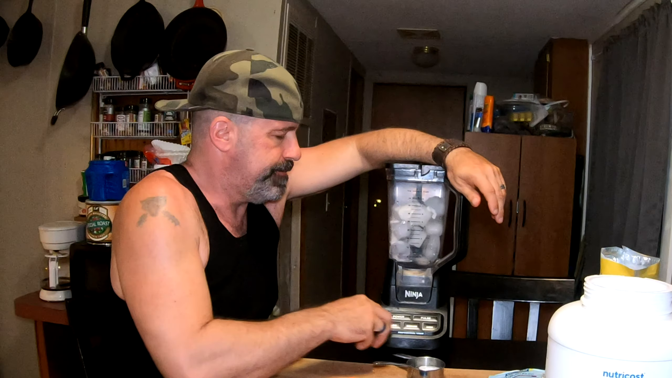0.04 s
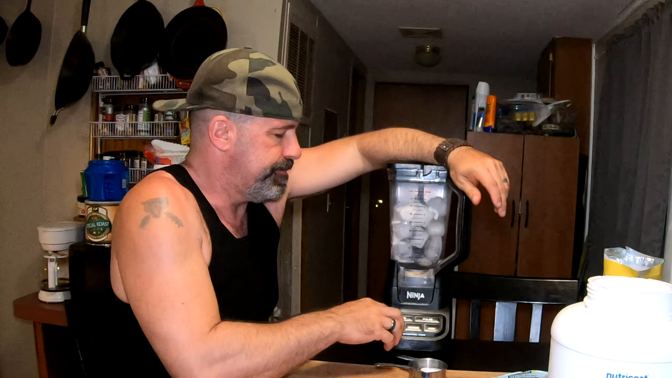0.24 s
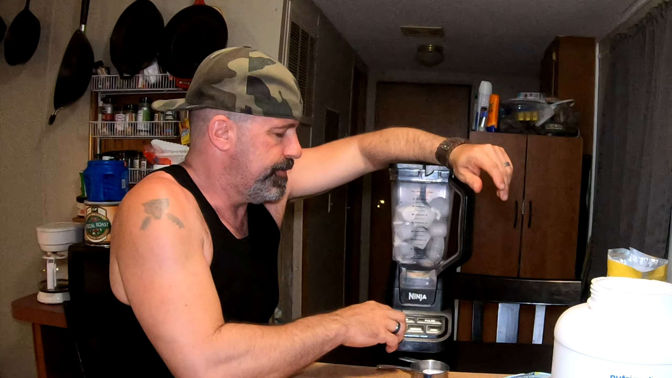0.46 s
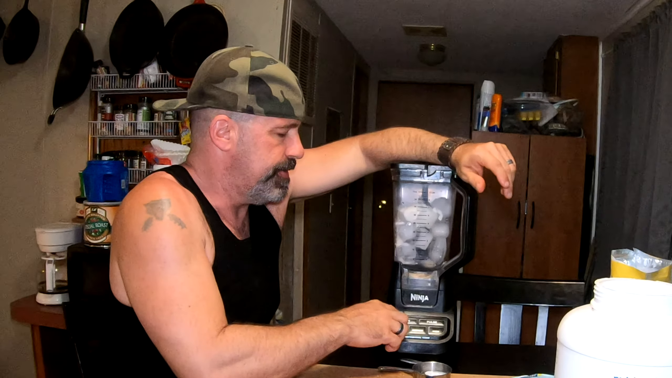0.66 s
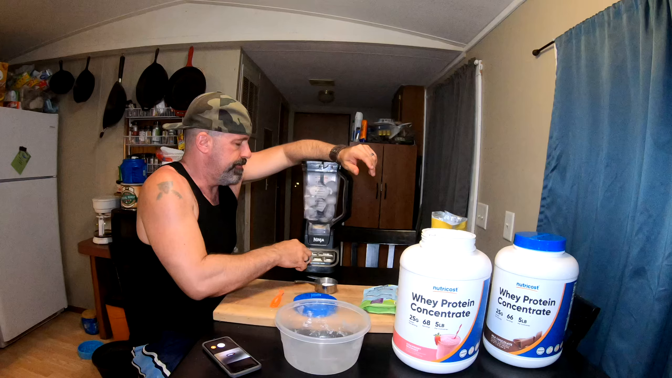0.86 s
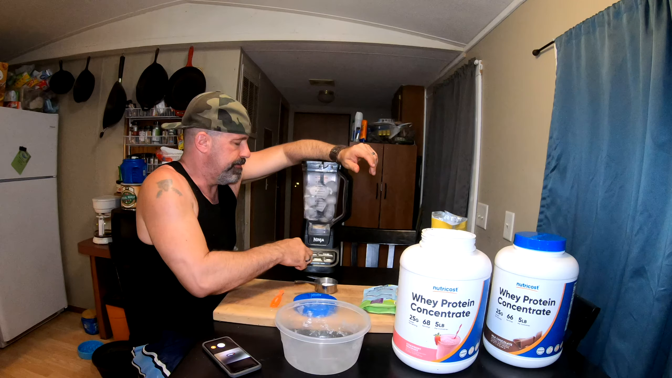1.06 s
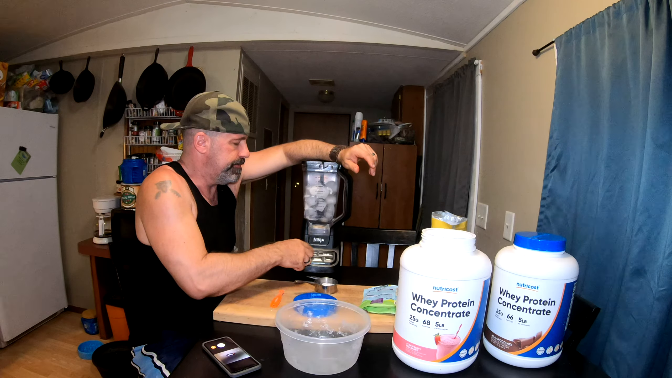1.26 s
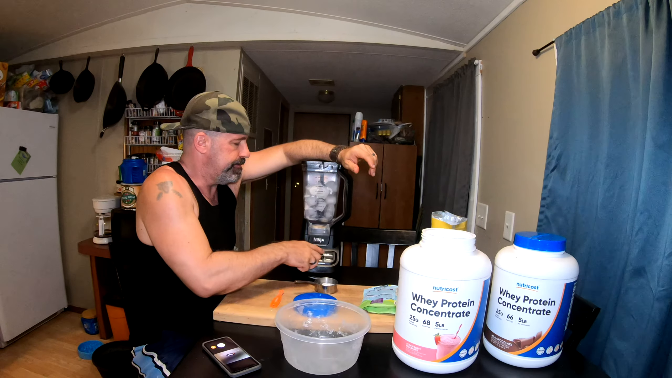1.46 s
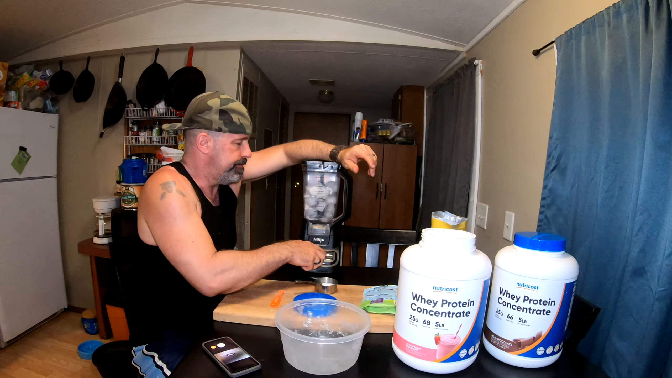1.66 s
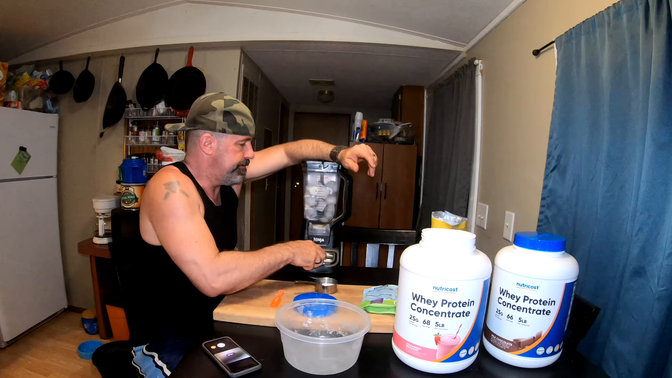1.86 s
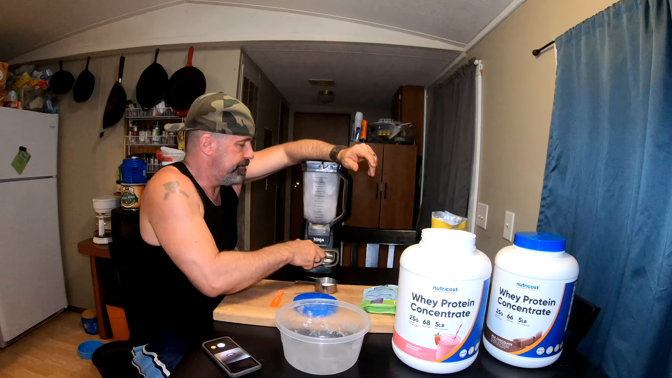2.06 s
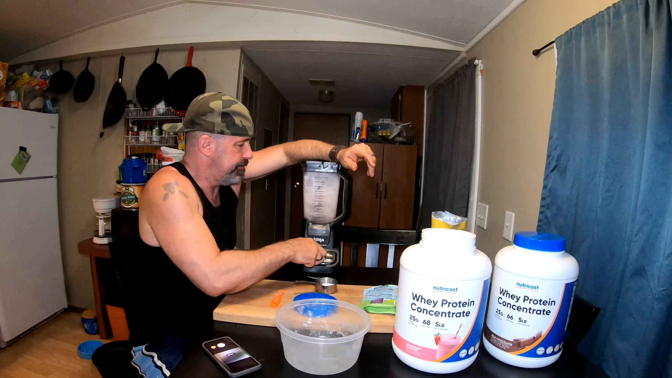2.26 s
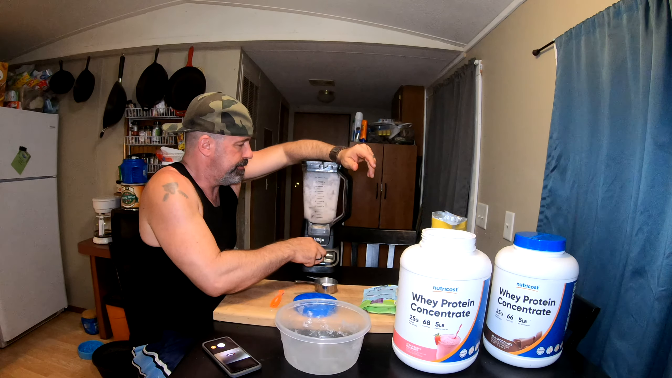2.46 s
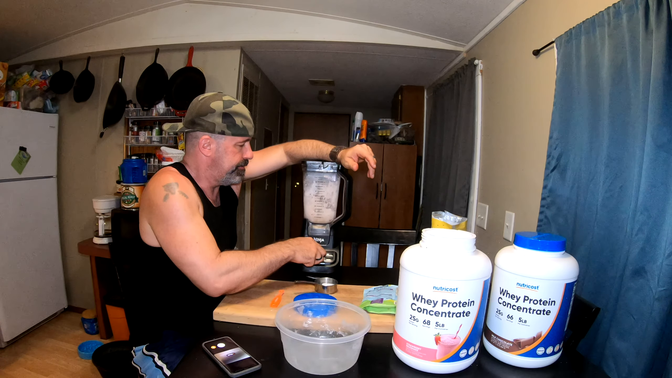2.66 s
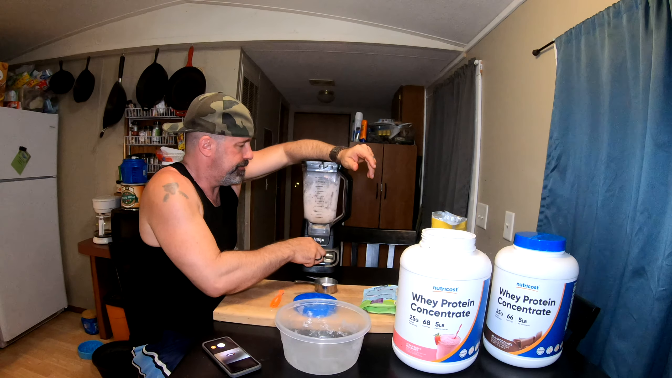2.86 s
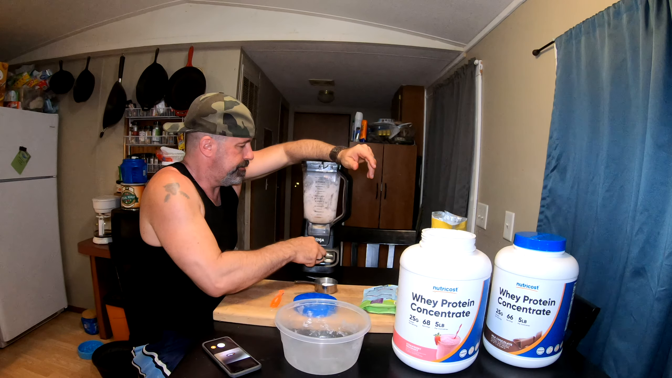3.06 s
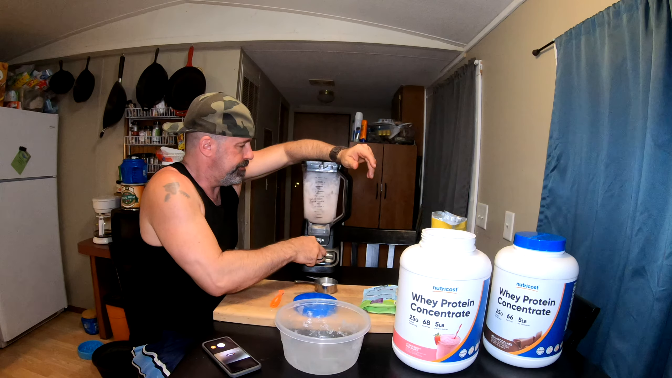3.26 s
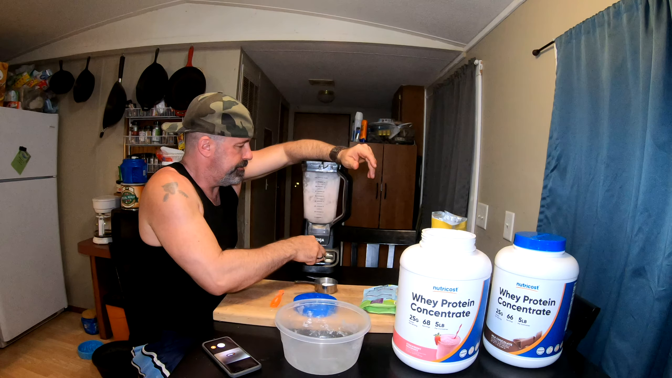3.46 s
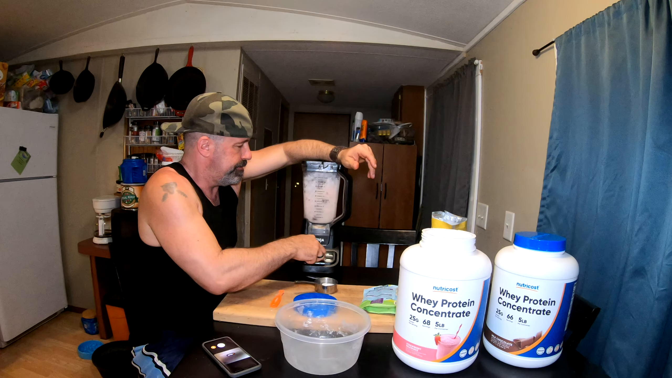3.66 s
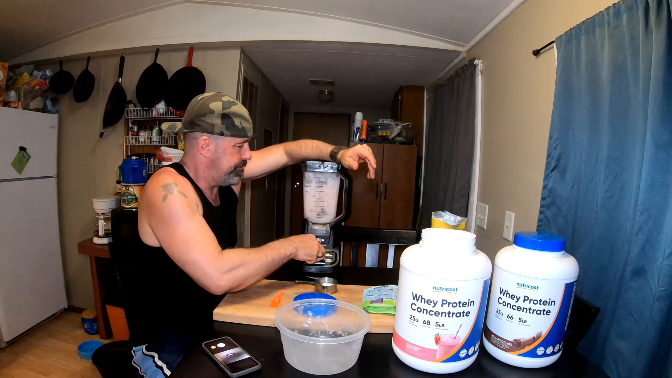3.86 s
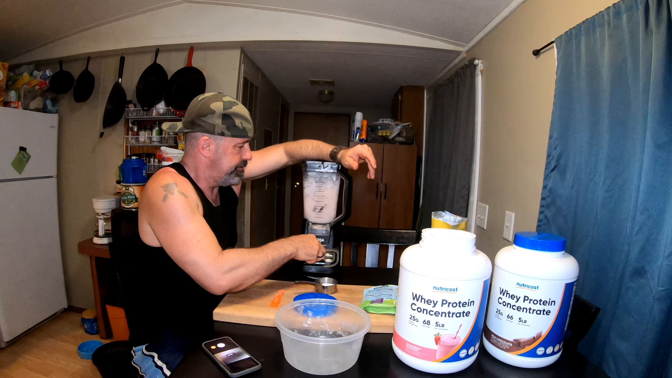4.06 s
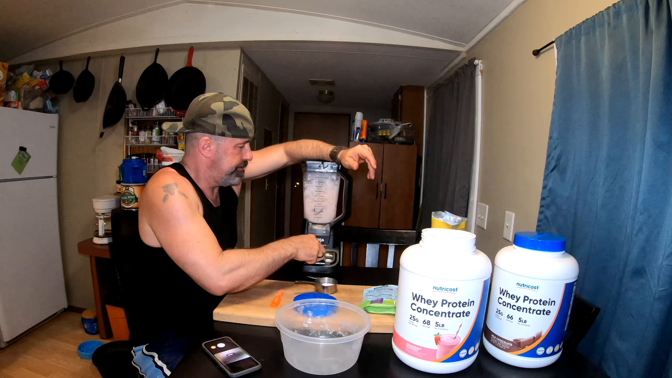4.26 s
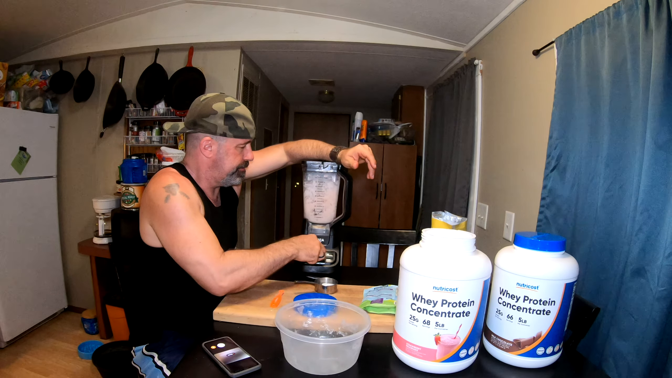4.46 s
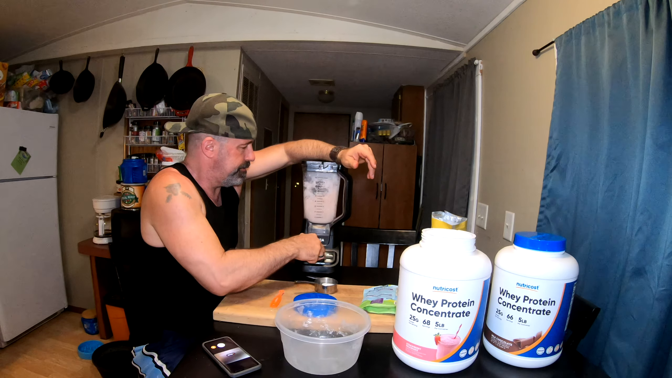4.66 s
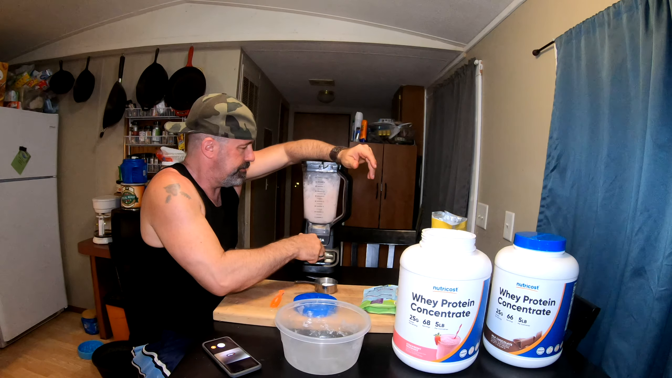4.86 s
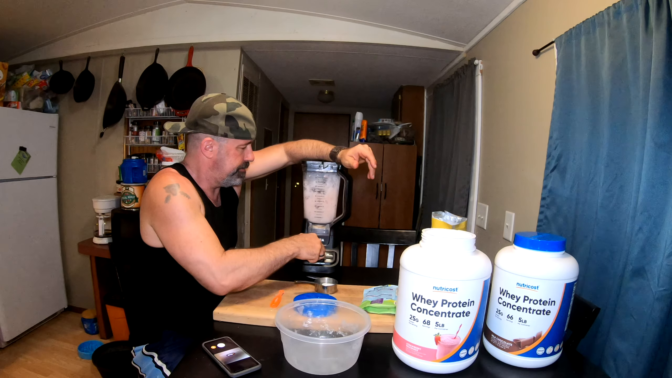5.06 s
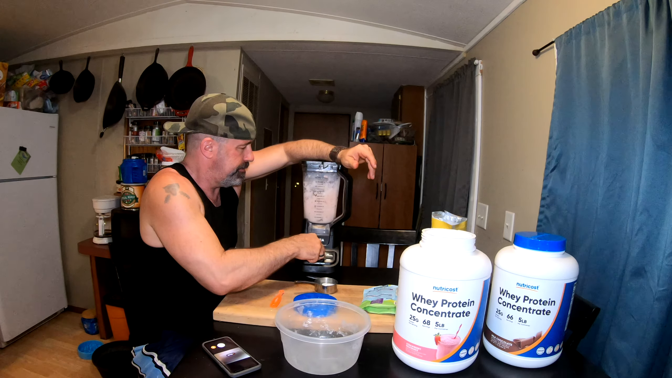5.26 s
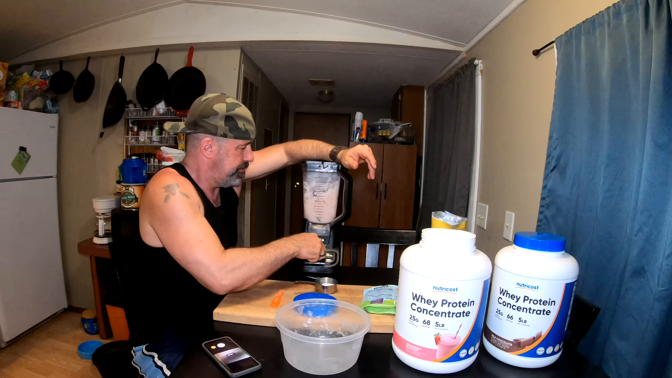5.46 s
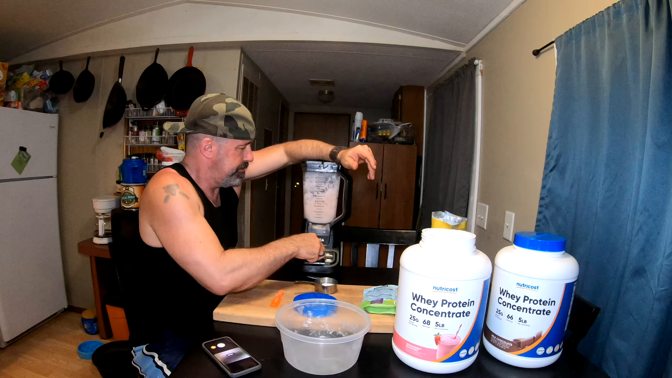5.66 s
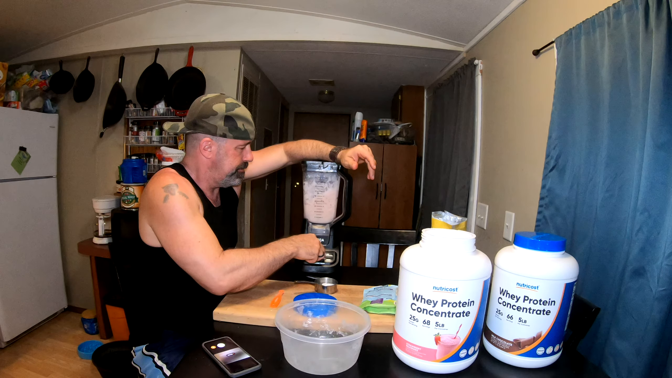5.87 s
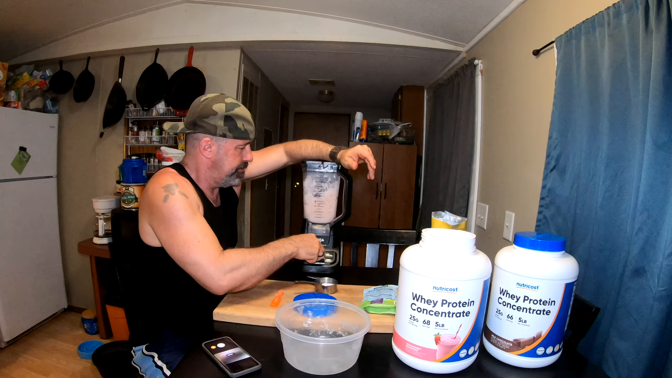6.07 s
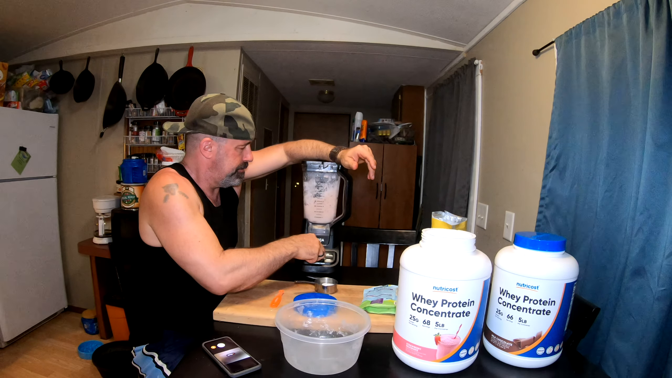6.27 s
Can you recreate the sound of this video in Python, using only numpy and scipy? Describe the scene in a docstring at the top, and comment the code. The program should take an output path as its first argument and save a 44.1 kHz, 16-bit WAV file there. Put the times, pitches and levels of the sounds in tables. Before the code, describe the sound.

A blender packed with ice is pulsed three times on a counter. Each burst begins with a key click and a bright relay tick, then booming, cracking, rattling chunks over a low wavering motor hum and fizzing splinters. The first is short and hits hardest at its start, the second longer, the third continuous. Indoor mid-distance microphone, short room reverberation, quiet gaps.

```python
"""Ice in a pulsed blender

A kitchen blender full of ice is pulsed three times across a small room; the third pulse runs to the end.
Filtered noise makes the room's rumble and hiss; the key pad creaks, the key snaps, a relay clicks.
Then random impacts of ice boom on the jar's modes, under cracks and a fizz of splinters.
Shaft hum, base thuds, an air tone, counter shake and a faint whine join in; both channels are alike."""
import sys
import numpy as np
from scipy import signal
from scipy.fft import rfft, irfft, next_fast_len
from scipy.io import wavfile
from scipy.ndimage import map_coordinates

SR = 44100
rng = np.random.default_rng(int(sys.argv[2]) if len(sys.argv) > 2 else 0)


def generate_wav(signal):
    """Clip the signal to [-1, 1] and save it as 16-bit WAV at the path in sys.argv[1]."""
    frames = np.transpose(np.atleast_2d(signal))
    scaled = np.clip(frames, -1, 1) * 32767
    pcm = np.round(scaled).astype(np.int16)
    wavfile.write(sys.argv[1], SR, pcm)


N = 278271
T = np.arange(N) / SR


def amp(db):
    """dB to gain."""
    return 10 ** (np.asarray(db) / 20)


def unit(x):
    """Scaled to rms 1."""
    return x / np.sqrt(np.mean(x ** 2) + 1e-20)


def along(points, hz):
    """Interpolates (frequency [Hz], value) points on a log-frequency axis."""
    f, v = np.transpose(points)
    return np.interp(np.log(hz + 1), np.log(f + 1), v)


def wobble(rate_hz):
    """Smooth random curve, rate_hz knots a second."""
    knots = rng.standard_normal(int(N * rate_hz / SR) + 4)
    return map_coordinates(knots, [T * rate_hz])


def filtered(x, response):
    """x times a complex response of frequency."""
    m = next_fast_len(N + SR // 2)
    return irfft(rfft(x, m) * response(np.fft.rfftfreq(m, 1 / SR)), m)[..., :N]


def tone(spectrum):
    """Gain of a (frequency [Hz], level [dB]) spectrum."""
    return lambda hz: amp(along(spectrum, hz))


def modes(table):
    """Causal sum of resonances, alternating in sign."""
    def response(f):
        total = 0
        for k, (center_hz, width_hz, db) in enumerate(table):
            damping = 1j * f * width_hz
            total = total + (-1) ** k * amp(db) * damping / (center_hz ** 2 - f * f + damping)
        return total
    return response


def even(response):
    """Same colour, passing white noise at its own rms."""
    norm = np.sqrt(np.mean(np.abs(response(np.linspace(0, SR / 2, 4096))) ** 2))
    return lambda hz: response(hz) / norm


def hail(rate_hz, spread_db, t60_s, smooth):
    """Random impacts: noise puffs of uneven size that start sharply, on a share of smooth noise."""
    size = np.minimum(rng.exponential(1, N), 3)
    blows = (rng.random(N) < rate_hz / SR) * amp(2 * spread_db * size)
    power = signal.lfilter([1], [1, -amp(-120 / (max(t60_s, 1e-4) * SR))], blows)
    return np.sqrt(power / power.mean() + smooth) * rng.standard_normal(N)


def puffs(times_s, db, t60_s):
    """Noise bursts at given times that die in t60_s."""
    kicks = np.zeros(N)
    kicks[np.round(np.asarray(times_s) * SR).astype(int)] = amp(db)
    return signal.lfilter([1], [1, -amp(-60 / (t60_s * SR))], kicks) * rng.standard_normal(N)


def knocks(times_s, db, hz, t60_s, size=1500):
    """Short damped sines, one a row, each size samples long."""
    t = np.arange(size) / SR
    decay = amp(db[:, None] - 60 * t / np.reshape(t60_s, (-1, 1)))
    rows = decay * np.sin(2 * np.pi * hz[:, None] * t)
    at = np.round(times_s * SR).astype(int)[:, None] + np.arange(size)
    return np.bincount(at.ravel(), rows.ravel(), N + SR)[:N]


# low room noise: (frequency [Hz], level [dB per Hz])
RUMBLE_SPECTRUM = [(7.1, -44.5), (12, 12), (17, -6.5), (64, -7), (73, -13.5), (87, -20), (200, -32),
                   (260, -47.5), (440, -120)]


def rumble():
    """Low room noise, made lumpy by a slow random gain."""
    noise = filtered(rng.standard_normal(N), tone(RUMBLE_SPECTRUM))
    return unit(amp(1.5 * wobble(9.34)) * noise)


# steady room noise: (frequency [Hz], level [dB per Hz])
HISS_SPECTRUM = [(71, -30.5), (120, -14.5), (230, -2.5), (307, -2.5), (339, -6), (510, -8.5), (565, -9.5),
                 (783, -11), (1600, -15.5), (8010, -19), (15700, -23.5)]


def hiss():
    """Smooth room hiss: steady coloured noise."""
    return unit(filtered(rng.standard_normal(N), tone(HISS_SPECTRUM)))


# soft contacts on pad and counter:
# (time [s], relative level [dB], resonance [Hz], width [Hz], t60 of the rub [s])
TOUCHES = [(0.248, -34, 384, 150, 0.09), (0.247, -39, 2380, 600, 0.071), (1.249, -35, 281, 30, 0.24),
           (1.25, -41, 540, 80, 0.2), (1.749, -38, 2360, 1990, 0.094), (1.87, -34.5, 1065, 89, 0.1),
           (3.061, -34, 1090, 89, 0.13), (4.467, -34, 1080, 90, 0.067), (4.495, -37, 1070, 90, 0.087)]


def touches():
    """A fingertip wakes one resonance with a short noise rub and a soft damped tap."""
    rubs = np.zeros(N)
    for s, db, hz, width_hz, t60_s in TOUCHES:
        rubs += filtered(puffs([s], db, t60_s), even(modes([(hz, width_hz, 0)])))
    s, db, hz, width_hz, t60_s = np.transpose(TOUCHES)
    # wide resonances get weaker taps
    return rubs + knocks(s, db + 3.5 - width_hz / 60, hz, 1.1 * t60_s, size=9000)


# room decay: (frequency [Hz], t60 [s])
ROOM_DECAY = [(200, 0.39), (2000, 0.31), (6000, 0.26), (14000, 0.13)]


def kitchen(x):
    """The room's tail: a noise response, each frequency dying at its own speed."""
    hz, t, z = signal.stft(rng.standard_normal(SR // 2), SR, nperseg=256)
    decay = amp(-60 * t / along(ROOM_DECAY, hz)[:, None])
    tail = signal.istft(z * decay, SR, nperseg=256)[1]
    delayed = np.pad(x, (300, 0))  # samples
    return signal.fftconvolve(delayed, tail / np.linalg.norm(tail))[:N]


# key snapping down: (time [s], relative level [dB])
KEY_PRESSES = [(0.961, -9.5), (1.906, -8.5), (3.118, -7), (4.54, -9)]
# panel ringing: (frequency [Hz], level [dB], t60 [s])
PANEL_MODES = [(284, -4.5, 0.18), (738, -21, 0.13), (1057, 3, .12), (1305, 0, 0.17), (1890, 0.5, 0.089),
               (1727, -17, .14), (2110, -8, 0.18), (2600, -5.5, 0.047), (3380, -17.5, .1),
               (3900, -21.5, 0.032)]
# key click: (frequency [Hz], level [dB per Hz])
SNAP_SPECTRUM = [(180, -42.5), (300, -0.5), (669, -14.5), (1040, -17), (1970, 4.5), (2360, -3.5),
                 (3860, -19.5), (4930, -20), (7790, -25), (15000, -49.5)]
# housing resonances: (frequency [Hz], width [Hz], level [dB])
HOUSING_MODES = [(1140, 960, 1.5), (1910, 260, 4.5), (2550, 210, -18.5), (3910, 560, -7)]
# key spring: (frequency [Hz], level [dB per Hz])
SPRING_SPECTRUM = [(1200, -37), (1750, -4), (2050, 5), (2350, -3.5), (3300, -36)]


def keys():
    """The key snaps, rings the plastic panel's damped modes and rattles the housing."""
    panel, t = np.zeros(N + SR), np.arange(SR // 4) / SR
    attack = 1 - np.exp(-t / 0.00067)
    for s, db in KEY_PRESSES:
        ring = np.zeros(len(t))
        for hz, level_db, t60_s in PANEL_MODES:
            decay = amp(level_db + rng.normal(0, 1.2) - 60 * t / t60_s)
            ring += decay * np.sin(2 * np.pi * hz * t)
        panel[round(s * SR):][:len(t)] += amp(db - 12) * ring * attack
    s, db = np.transpose(KEY_PRESSES)
    snap = filtered(puffs(s, db - 7.0, 0.1), even(tone(SNAP_SPECTRUM)))
    rattle = filtered(puffs(s, db - 10.5, 0.28), even(modes(HOUSING_MODES)))
    # the spring settles
    spring = filtered(puffs(s + 0.032, db - 14.5, 0.088), even(tone(SPRING_SPECTRUM)))
    return panel[:N] + snap + rattle + spring


# relay closing: (time [s], relative level [dB])
RELAY_CLOSINGS = [(1.963, -4.5), (3.18, -2.5), (4.596, -4)]
# contact click: (frequency [Hz], level [dB per Hz])
CONTACT_SPECTRUM = [(240, -38), (400, -16), (1280, -4), (2900, -14), (3650, -23.5), (10900, -10.5),
                    (15700, -25.5)]
# armature resonances: (frequency [Hz], width [Hz], level [dB])
ARMATURE_MODES = [(560, 42, -7.5), (1220, 140, -1), (3740, 280, -10.5), (5110, 290, -8.5), (7600, 440, -11)]


def relay():
    """Closing contacts give a bright, buzzing noise click; the armature resonates."""
    s, db = np.transpose(RELAY_CLOSINGS)
    bursts = puffs(s, db - 10.5, 0.18) + puffs(s, db - 17.0, 0.028)
    buzz = filtered(bursts, even(tone(CONTACT_SPECTRUM)))
    return buzz + filtered(puffs(s, db - 12.0, 0.21), even(modes(ARMATURE_MODES)))


# one row a pulse: (start [s], switch-off [s], base level [dB], first bite [dB], rise [s], sag [dB/s],
# fizz [dB], hum [dB], air [dB], thud [dB]); the last four are layer offsets
PULSES = [(2.023, 2.598, -11.5, 11, 0.0053, 14.5, -10, -12, -14, -8),
          (3.238, 4.119, -10.5, 3.5, 0.025, 7.5, -9.5, -7, -9, -16),
          (4.655, 7, -13, 4, 0.0059, 2, -9, -9, -9.5, -13.5)]
FIZZ, HUM, AIR, THUD = 6, 7, 8, 9  # columns
BITE_S, RISE_DB = 0.076, 14.5
COAST_DB_PER_S, KNEE_S = 149, 0.032  # coast rate is scaled per layer
REST_DB, REST_DB_PER_S = -31, 18  # settling mix re running level, before the layer's offset


def effort(extra=None, coast=1.0, bite=1.0, rest_db=0):
    """Gain of one layer over all pulses: rise, first bite, sag, coast-down, settling."""
    out = np.zeros(N)
    for row in PULSES:
        start_s, off_s, db, bite_db, rise_s, sag = row[:6]
        t = np.maximum(T - start_s, 0)
        late = KNEE_S * np.logaddexp(0, (T - off_s) / KNEE_S)  # soft-kneed time since switch-off
        run_db = db + bite * bite_db * np.exp(-t / BITE_S)
        run_db -= RISE_DB * np.maximum(1 - t / rise_s, 0)
        run_db -= sag * (t - late)
        if extra is not None:
            run_db += row[extra]
        coasting = amp(-coast * COAST_DB_PER_S * late)
        settling = amp(REST_DB + rest_db - REST_DB_PER_S * late)
        out += (T >= start_s) * amp(run_db) * np.hypot(coasting, settling)
    return out


# mix shifting in the jar:
# (time [s], hum level [dB], air-column level [dB], treble level [dB], mean shaft hum [Hz])
LOAD = [(2.05, 2, -2, 1.5, 282), (2.191, -9, 7.5, 2.5, 250), (2.4, -7, -2, 0, 290), (2.6, 7, 6, -2, 271),
        (2.72, -3, 0, -8, 260), (2.82, 0, 6, 8, 260.1), (2.88, 2, 4, -5, 260), (3.3, 2, -1, -2, 288.3),
        (3.5, -2.5, -0.5, -2, 257.7), (3.61, -5.5, 8.5, 0.5, 262.5), (3.72, 1.5, -2, 2, 280),
        (4.03, -2, -6.5, -2, 280.3), (4.7, -3, 4.5, -2, 278), (4.83, -3, 0, 0.5, 285),
        (4.93, -2, 4.5, -1, 284.5), (5.1, 1, -7, -1.5, 254.2), (5.24, 3.5, 0.5, -1.5, 252),
        (5.42, 6, -5, 2.5, 264.5), (5.72, -3.5, 1.5, 0.5, 274), (5.79, 2, 4.5, -0.5, 272),
        (5.95, 1.5, -6, 1, 288.6), (6.12, -3, 1, -1.5, 274.3), (6.31, 7.5, -12, -2, 268.5)]
LOAD_HUM, LOAD_AIR, LOAD_TREBLE, LOAD_HZ = 1, 2, 3, 4  # columns


def load(index):
    """One column of the shifting load, per sample."""
    rows = np.array(LOAD)
    return np.interp(T, rows[:, 0], rows[:, index])


def chunks(count):
    """Middling pieces rattle on the wall: damped tones at random times, levels, pitches; rms 1."""
    size, pitch = rng.standard_normal((2, count))
    times_s = rng.random(count) * (N - 1) / SR
    return unit(knocks(times_s, 4 * size, 1700 * np.exp(.45 * pitch), 0.0091))


# jar resonances: (frequency [Hz], width [Hz], level [dB])
JAR_MODES = [(154, 43, -11.5), (275.7, 74, 0), (409.4, 247, 0), (463.8, 129, 2), (591, 81, -7),
             (716, 82, -6), (876, 91, -12.5)]
# jar wall resonances: (frequency [Hz], width [Hz], level [dB])
WALL_MODES = [(1005, 146, -4.5), (1282, 117, 2.5), (1480, 585, -3.5), (2080, 254, 0), (2303, 586, -2.5),
              (2840, 744, 0), (3227, 1020, -4), (4730, 1020, -15)]
# splinter fizz: (frequency [Hz], level [dB per Hz])
SPLINTER_SPECTRUM = [(2350, -13.5), (4000, -4), (5350, -3), (8560, -2), (12900, -11), (15100, -22.5),
                     (15700, -32)]


def churn():
    """Ice tumbling in the jar: heavy pieces boom, small ones crack and rattle, splinters fizz."""
    surge = wobble(14)  # shared by all three
    boom = filtered(hail(110, 0.8, 0.1, 0.39), modes(JAR_MODES))
    boom = unit(amp(0.68 * surge) * boom)
    cracks = filtered(hail(220, 3.2, 0.072, 1.0), modes(WALL_MODES))
    cracks = unit(amp(1.1 * surge + 0.26 * wobble(30)) * cracks)
    cracks = unit(cracks + amp(-8) * chunks(count=900))
    fizz = filtered(hail(1000, 3.9, 0.032, 0.75), tone(SPLINTER_SPECTRUM))
    fizz = unit(amp(1.0 * surge) * fizz)

    treble_db = load(LOAD_TREBLE)
    boom_gain = amp(-4.5) * effort(coast=0.97)
    crack_gain = amp(-6.5 + 0.58 * treble_db) * effort(coast=1.0, bite=0.75, rest_db=-3)
    fizz_gain = amp(-1.5 + treble_db) * effort(FIZZ, coast=1.03, bite=0.75, rest_db=-7.5)
    return boom_gain * boom + crack_gain * cracks + fizz_gain * fizz


# base resonance: (frequency [Hz], level [dB per Hz])
BASE_SPECTRUM = [(70, -37), (115, -9.5), (175, 3), (215, 1), (300, -34)]


def base_thuds():
    """The tumbling load thuds in the base: low-coloured random impacts."""
    thud = unit(filtered(hail(60, 5.6, 0.02, 0.99), tone(BASE_SPECTRUM)))
    return effort(THUD, coast=1.0, bite=0.65) * thud


# air above the mix: (frequency [Hz], level [dB per Hz])
AIR_SPECTRUM = [(500, -43), (565, -4.5), (587, -0.5), (615, -2), (700, -43)]


def air_column():
    """The load blows on the air above the mix: narrow-band random puffs."""
    air = unit(filtered(hail(87, 2.0, 0.059, 0.69), tone(AIR_SPECTRUM)))
    return effort(AIR, coast=1.0, bite=0.8, rest_db=3.5) * amp(load(LOAD_AIR)) * air


def shaft():
    """The loaded shaft hums: a sine whose pitch and level waver at random."""
    hz = load(LOAD_HZ) * (1 + 0.02508 * wobble(40) + 0.02992 * wobble(12))
    level = effort(HUM, coast=1.07, bite=.4) * amp(load(LOAD_HUM) + 3.5 * wobble(25))
    return level * np.sin(2 * np.pi * np.cumsum(hz) / SR)


# counter under the running blender: (frequency [Hz], level [dB per Hz])
SHAKE_SPECTRUM = [(7.1, -41.5), (12, -10), (32, 10), (60, 3.5), (108, 5), (130, -14), (170, -36),
                  (290, -120)]
SHAKE_DB = -9.5  # re blender effort


def counter():
    """The counter shakes under the running blender: low noise with a wavering level."""
    shaken = filtered(rng.standard_normal(N), tone(SHAKE_SPECTRUM))
    return amp(SHAKE_DB) * effort(coast=0.72, bite=0.9) * unit(amp(1.5 * wobble(5)) * shaken)


# whine from each pulse's start to the next: mean level [dB]
WHINE_LEVELS = [-77, -73, -76]
WHINE_HZ = 4610  # mean


def whine():
    """A thin, faint sine from the first pulse on, wavering in pitch and level."""
    pulse = np.searchsorted([row[0] for row in PULSES], T)
    level = amp(np.array([-120, *WHINE_LEVELS])[pulse] + 3 * wobble(5.4))
    hz = WHINE_HZ * (1 + .002 * wobble(30))
    return level * np.sin(2 * np.pi * np.cumsum(hz) / SR)


# big lumps striking the jar: (time [s], relative level [dB], knock [Hz],
# boom offset [dB], treble offset [dB], knock offset [dB])
LUMPS = [(2.024, -2, 1830, -13, -24.5, -4), (2.4507, -10, 1250, 1.5, -10, -4.5),
         (2.5195, -5.5, 1220, -1.5, -13, -7), (2.6186, -18.5, 1423, 2, -16, -5),
         (2.7638, -39, 1280, -3, -12, -7), (3.271, -4, 1260, 8, -16, -6.5),
         (3.2966, -6.5, 1480, -1, -10, -4), (3.7536, -5, 1580, -4.5, -8, -8.5),
         (3.8628, -3, 1347, -1.5, -11, -8), (3.91, -5.5, 1394, -17, -12, -5.5),
         (3.9472, -6, 2176, -5, 0.5, -8), (4.0195, -16.5, 1300, -3.5, -13.5, -5),
         (4.0623, -2, 1340, -14, -4.5, -7.5), (4.1474, -15.5, 1276, -3, -10, -5),
         (4.1998, -28, 1750, -3, -10, -8), (4.6586, -7.5, 1330, 3, -14, -1),
         (4.6827, -7, 1440, 7, -16, -3.5), (4.915, -11, 1900, 2, -12, -4), (5.004, -5.5, 1290, -4, -19, -7),
         (5.2766, -5.5, 1270, 1.5, -12, -6), (5.5181, -3.5, 1230, -4, -22, -7),
         (5.6128, -2.5, 1300, -8.5, -6.5, -5.5), (5.6999, -2, 1640, -1.5, 2, -6.5),
         (5.8015, -14, 2240, 4, -14.5, -5), (5.8423, -5, 2160, -1.5, -14.5, -7),
         (5.915, -6, 1590, -3, -12, -4.5), (5.9444, -10, 1282, -1, -4, 1.5),
         (5.9976, -9.5, 1590, -8, -18.5, -4), (6.0285, -2, 1762, 0, -0.5, -9.5),
         (6.1405, -3.5, 1790, -0.5, -14, -2.5), (6.1521, -4.5, 1213, -4.5, -19, -4.5),
         (6.2421, -5, 1758, -8, -22, 0)]


def lumps():
    """Each lump excites jar, wall and splinters at once, and knocks at its own pitch."""
    s, db, hz, boom_db, treble_db, knock_db = np.transpose(LUMPS)
    boom = filtered(puffs(s, db + boom_db - 4.0, 0.053), even(modes(JAR_MODES)))
    crack = filtered(puffs(s, db - 12.0, 0.059), even(modes(WALL_MODES)))
    spray = filtered(puffs(s, db + treble_db - 18, 0.091), even(tone(SPLINTER_SPECTRUM)))
    return boom + crack + spray + knocks(s, db + knock_db, hz, 0.029)


# gain of hands and room noise; fades in, drops just before the first pulse, stays low:
# (time [s], level [dB])
QUIET_GAIN = [(0, -7), (.4, -0.5), (2.004, -0.5), (2.018, -17), (3.1, -18), (6.31, -17)]
RUMBLE_DB, HISS_DB = -25, -43.5  # rms, before QUIET_GAIN


def scene():
    """Blender and fingers in the room, over its rumble and hiss."""
    background = amp(RUMBLE_DB) * rumble() + amp(HISS_DB) * hiss()
    hands = touches() + keys() + relay()
    quiet = hands + amp(-13.5) * kitchen(hands) + background
    quiet = amp(np.interp(T, *np.transpose(QUIET_GAIN))) * quiet
    blender = churn() + base_thuds() + air_column() + shaft() + lumps()
    blender_in_room = blender + amp(-14.0) * kitchen(blender)
    return np.tile(blender_in_room + counter() + whine() + quiet, (2, 1))


TOP_HZ = 15850


def record(dry):
    """Peaks are squeezed by a soft limit; nothing passes above TOP_HZ."""
    squeezed = dry / (1 + np.abs(dry / 1.02) ** 12) ** (1 / 12)
    return filtered(squeezed, lambda hz: hz < TOP_HZ)


dry = scene()
out = record(dry)
generate_wav(out)
```